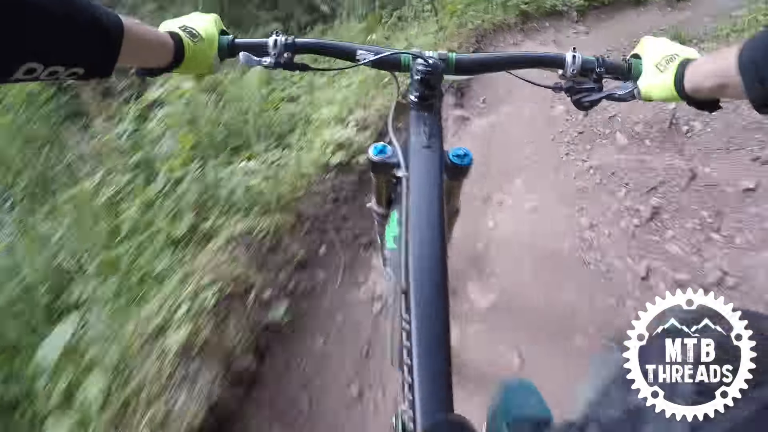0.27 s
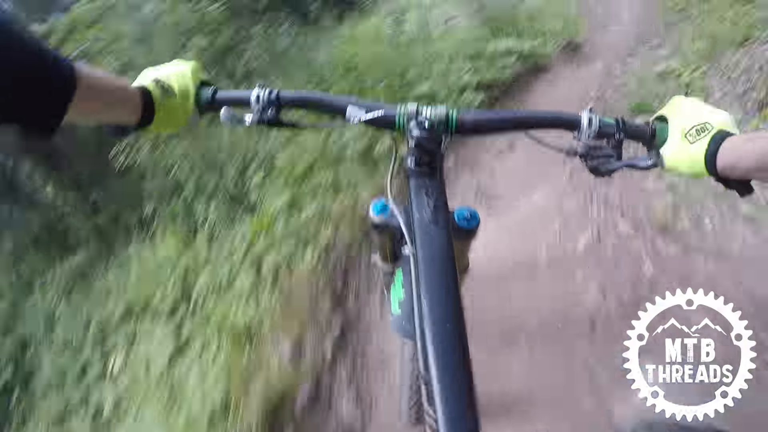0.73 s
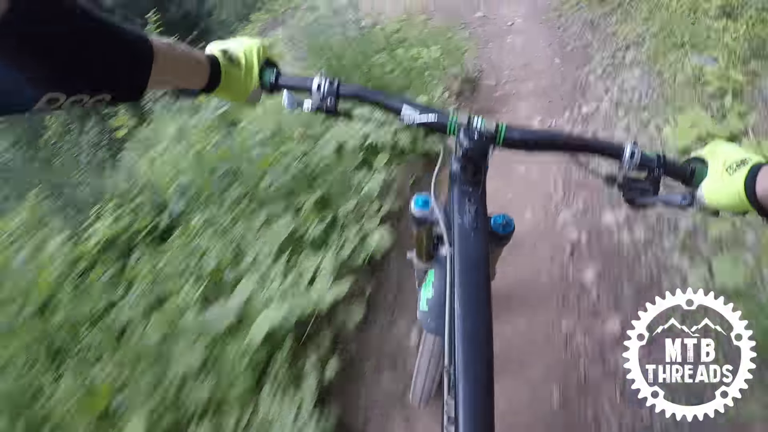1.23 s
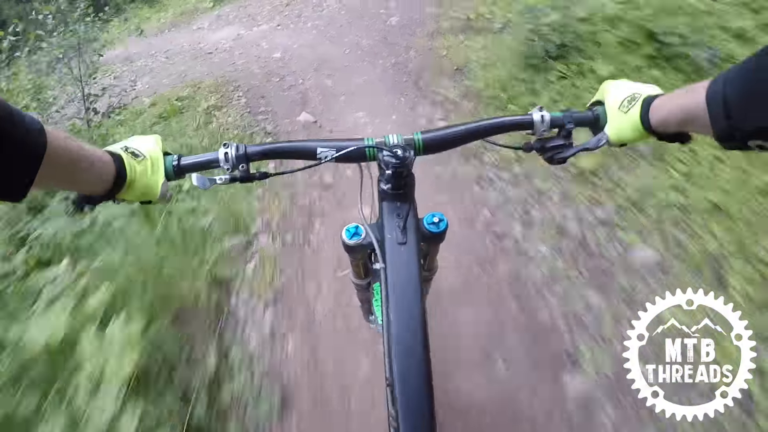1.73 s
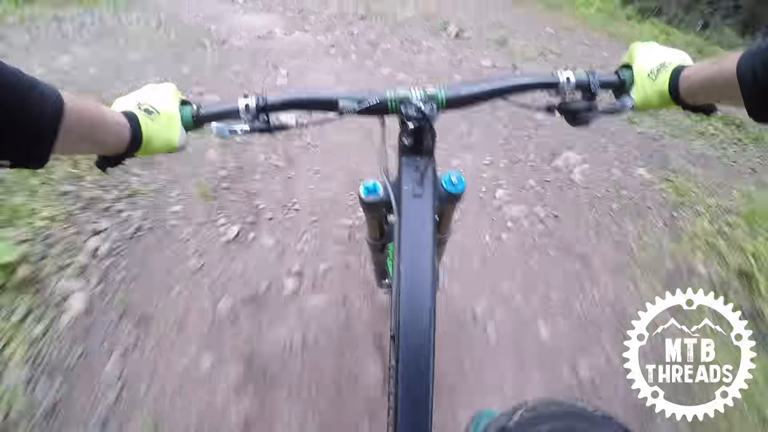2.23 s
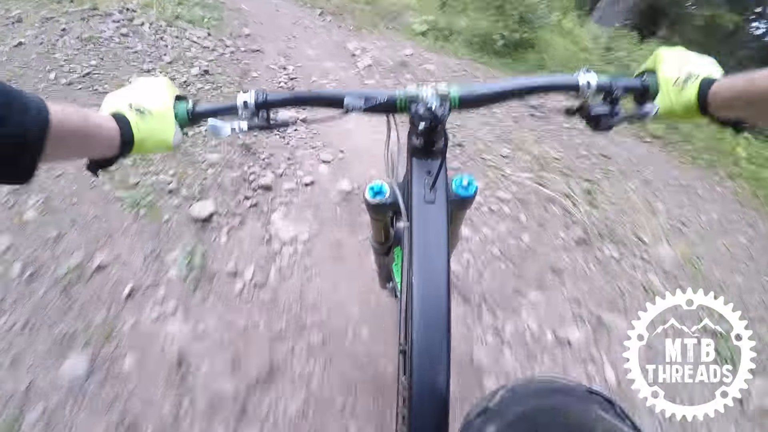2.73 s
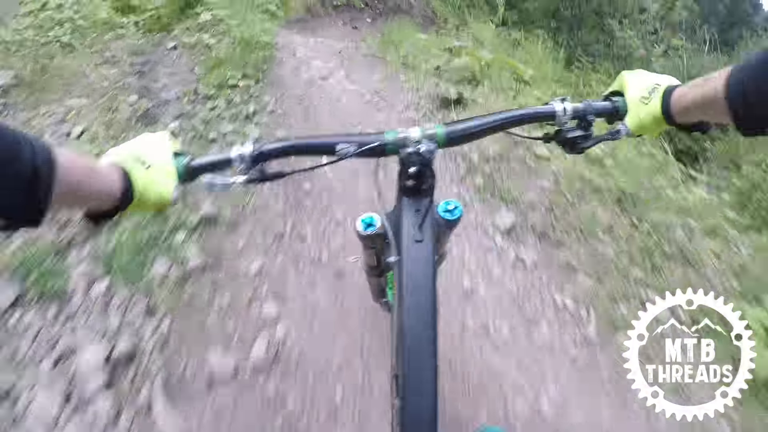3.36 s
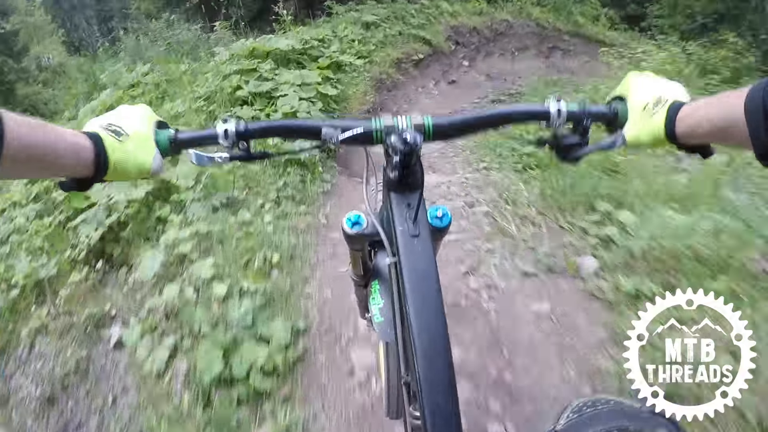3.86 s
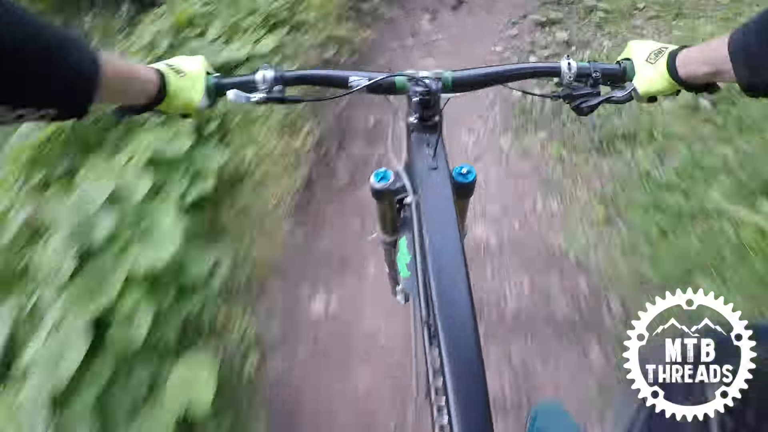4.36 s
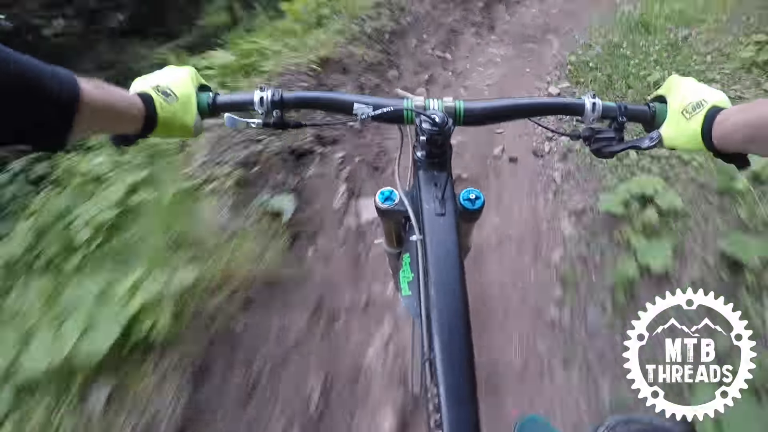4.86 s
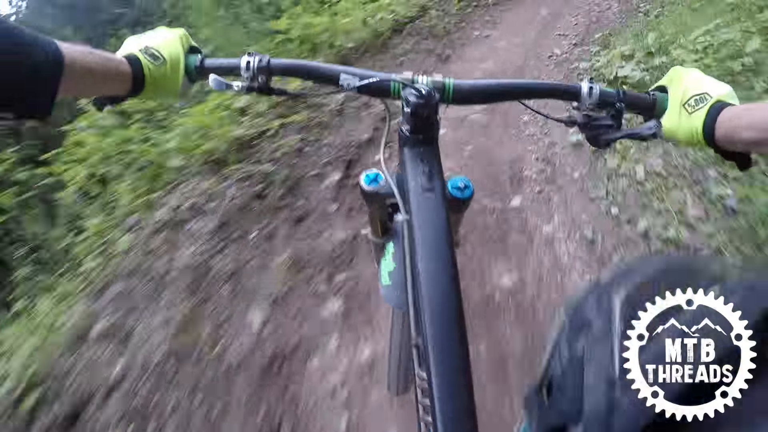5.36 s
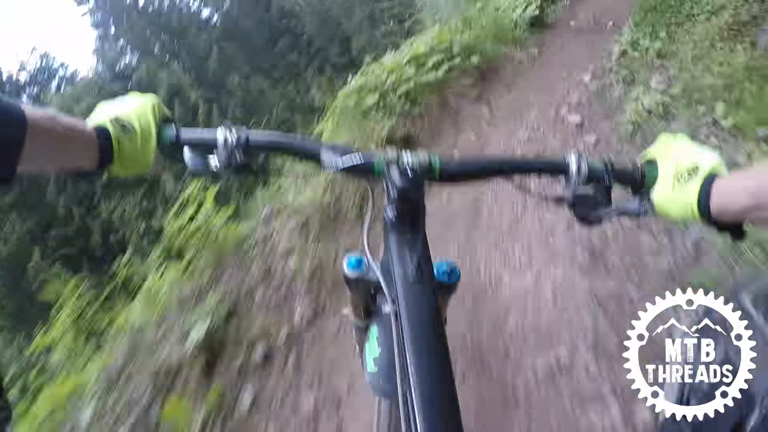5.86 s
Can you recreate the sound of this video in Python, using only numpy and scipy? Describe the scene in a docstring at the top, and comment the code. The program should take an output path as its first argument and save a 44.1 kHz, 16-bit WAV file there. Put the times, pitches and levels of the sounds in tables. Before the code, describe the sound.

Close, dry and windy outdoor bike sound: quick clacks of chain and cable on a hollow frame, with a hard knock half a second in. The rattling eases briefly around one second, then resumes with thumps and louder gravel crunch near two. It thins to wind and light grit past three, then bursts into dense knocks near four and a half. Low gusts bump the chest-mounted microphone throughout, with a very faint high hiss early on.

```python
"""Wind buffets a microphone on the rider's chest as a mountain bike runs down a stony dirt trail.
Shaped noise makes the wind and the bed of tyre crunch; damped clicks and noise snaps make grit and stones.
Chain and cables slap the frame as noise bursts with ringing modes; the fork thuds as damped sine swings.
A thin narrow-band hiss near the top of hearing comes and goes, and the top treble differs left to right."""
import sys
import numpy as np
from scipy import signal
from scipy.fft import rfft, irfft, next_fast_len
from scipy.io import wavfile
from scipy.ndimage import uniform_filter1d, minimum_filter1d, map_coordinates

SR = 44100
rng = np.random.default_rng(int(sys.argv[2]) if len(sys.argv) > 2 else 0)


def master_out(mix):
    """Clip the mix to full scale and print it as 16-bit PCM to the path in sys.argv[1]."""
    frames = np.transpose(np.atleast_2d(mix))
    ceiling = np.clip(frames, -1, 1)
    pcm = np.round(ceiling * 32767).astype(np.int16)
    wavfile.write(sys.argv[1], SR, pcm)


N = 268569  # length in samples

# Resonances of the bike frame. Each row: centre in Hz, bandwidth in Hz, relative level in dB.
FRAME_MODES = [(1467, 44, -17), (2356, 110, -4), (2807, 68, -2.5), (3806, 37, -17.5), (5400, 280, -5),
               (5810, 260, -6)]
# Colour of crushed grit. Each row: frequency in Hz, relative level in dB.
GRIT_COLOUR = [(350, -27), (600, 0), (1240, -7), (1450, -7), (2130, -11), (2340, -8.5), (3380, -15),
               (4100, -10), (4820, -14.5), (5760, -11.5), (6970, -27.5), (8320, -26), (11100, -35),
               (13200, -27.5), (15600, -41)]
# Colour of stones and slapping links. Each row: frequency in Hz, relative level in dB.
CLATTER_COLOUR = [(410, -3), (700, -3), (1150, -5.5), (1430, -2.5), (1880, -2), (2560, -2), (2770, -3),
                  (3150, -5.5), (3930, -3.5), (4840, -5), (5960, -5.5), (9260, -22.5), (10800, -37),
                  (12800, -18.5), (15600, -40)]


def amp(db):
    """Decibels to a linear amplitude."""
    return 10 ** (np.asarray(db) / 20)


def unit(x):
    """x scaled to an rms of 1."""
    return x / np.sqrt(np.mean(x ** 2) + 1e-20)


def along(points, hz):
    """Values at hz, read between (Hz, value) points on a log frequency axis."""
    f, v = np.transpose(points)
    return np.interp(np.log(hz + 1), np.log(f + 1), v)


def curves(rows):
    """One value per sample for each column after the time in seconds."""
    s, *columns = np.transpose(rows)
    return [np.interp(np.arange(N) / SR, s, column) for column in columns]


def wobble(rate):
    """A smooth random curve through normal random knots, rate knots a second."""
    knots = rng.standard_normal(int(N * rate / SR) + 4)
    return map_coordinates(knots, [np.arange(N) * rate / SR])


def filtered(x, response):
    """x shaped by a response, real or complex, that is a function of frequency in Hz."""
    m = next_fast_len(N + SR // 2)
    hz = np.fft.rfftfreq(m, 1 / SR)
    return irfft(rfft(x, m) * response(hz), m)[..., :N]


def above(hz, edge_hz, order):
    """Smooth high-pass share, 0 to 1."""
    return 1 - 1 / (1 + (hz / edge_hz) ** order)


def rush(spectrum, patchy_db):
    """Coloured noise of rms 1, uneven in time and frequency through patches of random gain."""
    z = signal.stft(rng.standard_normal(N), nperseg=512)[2]
    patches = uniform_filter1d(rng.standard_normal(z.shape), 5, 0)  # smooth over frequency
    patches = uniform_filter1d(patches, 8, 1)  # smooth over time
    x = signal.istft(z * amp(patchy_db * unit(patches)), nperseg=512)[1][:N]
    return unit(filtered(x, lambda hz: amp(along(spectrum, hz))))


def frame(hz, share):
    """Response of the bike frame: a flat path plus resonant band-pass modes, weighted by share."""
    modes = sum(amp(db) * 1j * hz * width / (centre * centre - hz * hz + 1j * hz * width)
                for centre, width, db in FRAME_MODES)
    return 1 + share * modes


def wind():
    """Steady buffeting and roar; each gust adds one slow push of the diaphragm and a swell of the roar."""
    # Steady wind between gusts. Each row: time in seconds, buffeting level in dB, roar level in dB.
    steady = [(0.0, -15.5, -32.5), (0.37, -14.5, -32.5), (0.52, -18, -31), (1.31, -26, -36),
              (2.03, -16, -23.5), (2.19, -16.5, -24.5), (2.53, -18.5, -36.5), (2.95, -20, -31),
              (3.29, -14, -33.5), (3.48, -21, -42.5), (3.66, -27, -27.5), (3.8, -24.5, -29.5),
              (4.09, -22.5, -29), (4.49, -21.5, -25.5), (4.95, -20.5, -34.5), (5.77, -19.5, -30),
              (5.92, -16.5, -26), (6.09, -21, -42)]
    # Colour of the low buffeting. Each row: frequency in Hz, relative level in dB.
    buffet_colour = [(7.1, -49), (12, 2.5), (38, -3.5), (134, -13), (200, -38), (260, -30), (440, -120)]
    # Colour of the roar. Each row: frequency in Hz, relative level in dB.
    roar_colour = [(76, -12.5), (130, -2), (295, -3.5), (389, -10.5), (492, -8.5), (675, -21),
                   (1500, -36.5), (1950, -48), (3300, -120)]
    # Eddies that hit the microphone.
    # Each row: centre in seconds, push level in dB, swing of the push in Hz, roar swell level in dB.
    gusts = [(0.112, -4, 43, -28), (0.273, -5.5, 63.6, -50), (0.345, -5.5, 30.5, -25), (0.537, -5, 39, -17),
             (0.678, -7, 32, -22), (0.86, -8, 30, -49), (1.118, -6.5, 45, -47), (1.438, -4, 36, -33),
             (1.562, -5, 36.2, -25), (1.764, -8, 30.5, -20.5), (1.846, -15, 76, -21.5),
             (1.919, -7, 30.7, -23), (2.062, -5, 45.3, -32), (2.175, -7.5, 40, -30), (2.258, -6, 49.6, -19),
             (2.349, -14, 36, -36), (2.447, -1, 53.5, -26), (2.629, -7, 64, -47), (2.781, -9, 28.8, -24),
             (2.883, -6, 56, -12.5), (2.945, -5.5, 30.8, -29), (3.075, -4, 48.7, -31),
             (3.193, -25, 36, -46), (3.265, -6.5, 34.5, -49), (3.425, -7.5, 67.7, -54),
             (3.93, -10.5, 40.8, -21), (4.323, -6, 29.4, -19), (4.474, -9, 38, -37), (4.527, -9, 24.5, -41),
             (4.676, -4, 59.5, -21.5), (4.879, -4.5, 59, -19.5), (5.039, -8, 37.6, -49),
             (5.206, -21, 38.6, -28), (5.261, -8, 29.4, -46), (5.466, -7.5, 27, -57),
             (5.534, -8, 34.4, -24.5), (5.648, -4.5, 83, -20), (5.771, -6.5, 66.5, -27),
             (5.838, -2, 36, -24), (5.931, -4.5, 38.6, -23)]
    push_turns, swell_s = .36, .014  # push width in cycles of its swing; swell width in seconds

    buffet_db, roar_db = curves(steady)
    buffet = unit(amp(1.3 * wobble(12)) * rush(buffet_colour, patchy_db=0))
    roar = unit(amp(2.17 * wobble(30)) * rush(roar_colour, patchy_db=2.5))
    pushes = np.zeros(N)
    roar_power = amp(roar_db) ** 2
    phases = rng.uniform(0, 2 * np.pi, len(gusts))
    for (s, push_db, hz, swell_db), phase in zip(gusts, phases):
        near = np.arange(-SR // 12, SR // 12) + round(s * SR)
        u = near / SR - s  # seconds from the centre of the gust
        swing = np.sin(2 * np.pi * hz * u + phase)
        pushes[near] += amp(push_db) * swing * np.exp(-.5 * (u * hz / push_turns) ** 2)
        roar_power[near] += amp(swell_db) ** 2 * np.exp(-(u / swell_s) ** 2)
    return amp(buffet_db) * buffet + pushes + np.sqrt(roar_power) * roar


def tyres():
    """A bed of crushed grit with single pieces clicking and stones snapping out in clumps."""
    # Loudness of the tyres on the trail. Each row: time in seconds, crunch level in dB.
    crunch = [(0.0, -42), (0.52, -36), (0.8, -42.5), (1.24, -43), (2.03, -30.5), (2.34, -30), (2.63, -36.5),
              (3.05, -38.5), (3.17, -46.5), (3.39, -44.5), (3.8, -37.5), (4.14, -38.5), (4.51, -29.5),
              (4.66, -33.5), (4.94, -38), (5.17, -33.5), (5.48, -32), (6.09, -35)]
    # The treble dips briefly after the hard knock, as gain control would do; set here on this layer.
    # One row: start in seconds, length in seconds, change in dB.
    treble_dip = (.538, .036, -12)
    grain_db, stones_db = -4, -6.5  # levels before the crunch level is applied

    level_db, = curves(crunch)
    bed = rush(GRIT_COLOUR, patchy_db=3.0) * amp(2.0 * wobble(25))

    chance = 500 / SR * amp(4.6 * wobble(24))  # around 500 snaps a second, in clumps
    snaps = (rng.random(N) < chance) * amp(16 * rng.exponential(1, N).clip(0, 3))
    t = np.arange(SR // 50) / SR
    crackle = signal.fftconvolve(snaps, amp(-60 * t / 0.024))[:N]  # each snap dies away in a few ms
    stones = filtered(np.abs(crackle) * rng.standard_normal(N),
                      lambda hz: amp(along(CLATTER_COLOUR, hz)) * frame(hz, share=0.39))

    start, length, dip_db = treble_dip
    inside = abs(np.arange(N) / SR - start - length / 2) < length / 2
    level_db += dip_db * uniform_filter1d(1. * inside, size=200)  # soft edges
    pieces = amp(grain_db) * unit(grains(count=7000))
    return amp(level_db) * unit(bed + pieces + amp(stones_db) * unit(stones))


def grains(count):
    """Tiny damped sine clicks of grit, each with its own pitch and size."""
    middle_hz, spread, turns = 3080, 0.568, 4.4  # pitch, its log scatter, decay time in cycles
    when, pitch, size = rng.random(count), rng.standard_normal(count), rng.exponential(1, count)
    hz = np.clip(middle_hz * np.exp(spread * pitch), 700, 9000)[:, None]
    k = np.arange(160)  # samples in one click
    clicks = np.sin(2 * np.pi * hz * k / SR) * np.exp(-hz * k / SR / turns)
    clicks = amp(4.9 * size.clip(0, 3))[:, None] * clicks
    at = (when[:, None] * N).astype(int) + k
    return filtered(np.bincount(at.ravel(), clicks.ravel())[:N], lambda f: amp(along(GRIT_COLOUR, f)))


def slaps():
    """Each slap is a noise burst of tiny link contacts in three bands, and rings the frame modes."""
    # Chain and cable slaps. Each row: time in seconds, nominal peak in dB, hollow band in dB and
    # bright band in dB relative to that peak, time to fall 60 dB in seconds.
    knocks = [(0.0216, -18.5, -11, -29, 0.055), (0.2175, -13.5, -16, -34, 0.046),
              (0.2463, -9, -11, -17, 0.033), (0.3067, -28.5, -20, -22, 0.09), (0.347, -19, -12, -21, 0.084),
              (0.377, -6, -19.5, -19.5, 0.045), (0.3924, -21, -2, -30, 0.038),
              (0.4394, -21, -0.5, -12.5, 0.036), (0.522, -19.5, -0.5, 1, 0.035),
              (0.5292, -21, 9, -33, 0.027), (0.574, -21.5, -19, -12, 0.046), (0.591, -21, -16, -20, 0.049),
              (0.6025, -18, -12, -14.5, 0.091), (0.6504, -11.5, -5.5, -12, 0.036),
              (0.6644, -18, -4.5, -14, 0.073), (0.738, -14, -9, -19, 0.051), (0.852, -16, -11, -16, 0.05),
              (1.2417, -31.5, -2, -4, 0.029), (1.3139, -3, -16.5, -21, 0.056),
              (1.33, -11.5, -33, -15, 0.05), (1.3702, -8, -16.5, -20.5, 0.073),
              (1.3918, -9.5, -15.5, -25.5, 0.069), (1.455, -26, -11, -14, 0.06),
              (1.6516, -29, -8, -29, 0.065), (1.692, -11.5, -12.5, -20.5, 0.04),
              (1.7138, -18.5, -10.5, -19, 0.073), (1.8364, -12.5, -21, -26, 0.036),
              (1.8608, -14.5, -12, -14.5, 0.043), (1.9604, -20, -8, -9.5, 0.044),
              (1.9924, -13, -20, -43, 0.065), (2.0323, -14.5, -14, -17, 0.046),
              (2.0854, -9, -14, -19, 0.028), (2.16, -16.5, -11, -21, 0.17), (2.376, -6, -15, -19, 0.065),
              (2.413, -14, -6, -22, 0.075), (2.4368, -18, -7, -19, 0.12), (2.4573, -11.5, -18, -18.5, 0.12),
              (2.5458, -10, -18, -19, 0.033), (2.6876, -16, -6, -15.5, 0.036),
              (2.813, -18.5, -2.5, -23, 0.026), (2.879, -22, -6, -28, 0.031),
              (2.8945, -17, -15, -20, 0.072), (2.9078, -6.5, -15, -24, 0.057),
              (2.9234, -8.5, -17, -24, 0.095), (2.9584, -20, -13, -21, 0.026),
              (2.9881, -24, -12, -16, 0.051), (3.0564, -14, -36, -14.5, 0.044),
              (3.0682, -16, -6.5, -36, 0.1), (3.0963, -15.5, -10.5, -17, 0.11),
              (3.131, -14, -8.5, -20, 0.061), (3.1643, -20, -14, -26, 0.052),
              (3.192, -20.5, -20, -16.5, 0.087), (3.2065, -34, -20, -24, 0.042),
              (3.3996, -27.5, -7, -33, 0.05), (3.4984, -27, -10, -44, 0.043),
              (3.8791, -16, -10.5, -22, 0.09), (3.9692, -11, -18, -22, 0.048),
              (4.0723, -5, -14.5, -21.5, 0.053), (4.122, -20, -5, -13.5, 0.14),
              (4.2423, -19, -30, -13, 0.047), (4.2923, -32, 7, -8, 0.04), (4.371, -8, -19, -22, 0.071),
              (4.3918, -5, -7.5, -19.5, 0.035), (4.4508, -3.5, -8, -14, 0.024),
              (4.46, -12.5, -13, -27, 0.074), (4.4788, -6, -11, -19, 0.07), (4.505, -14, -14, -27, 0.2),
              (4.5543, -15, -16, -19, 0.098), (4.583, -28, -16, -5, 0.037), (4.629, -24, -8, -13, 0.057),
              (4.8045, -28, 0, -31, 0.06), (4.818, -20, 1.5, -18, 0.043), (4.9472, -12.5, -29, -22, 0.051),
              (4.9905, -6, -9.5, -21.5, 0.03), (5.0164, -21, -28, -14, 0.043),
              (5.1484, -4.5, -13.5, -30, 0.046), (5.1936, -18, -12, -28, 0.036),
              (5.211, -7, -14, -17, 0.032), (5.2317, -19.5, -3.5, -16, 0.073), (5.277, -7, -14, -18, 0.076),
              (5.3433, -16.5, -6.5, -20, 0.065), (5.46, -16.5, -20, -11.5, 0.026),
              (5.485, -36.5, 10.5, -32, 0.068), (5.5215, -24, 0, -15, 0.16),
              (5.5767, -8.5, -12, -20.5, 0.062), (5.628, -16.5, -8, -21, 0.2),
              (5.673, -10, -15, -16.5, 0.075), (5.842, -10.5, -24, -21, 0.073),
              (5.8546, -14.5, -9, -33, 0.065), (5.877, -8.5, -12.5, -21, 0.095),
              (5.9309, -21.5, 5.5, -32, 0.033)]
    rise_s, fall_power, crest_db = 0.0023, 1.25, 11  # the fall steepens; peak over rms in dB
    lead_s, lead_db = .006, -18  # a faint noise swells in just before each slap
    ring_rise_s, ring_db, ring_scatter_db = .0012, -9, 4  # each slap excites the modes differently

    shape, rings = np.zeros((3, N + SR)), np.zeros(N + SR)
    t = np.arange(SR // 8) / SR
    lead = round(SR * .02)
    scatters = rng.standard_normal((len(knocks), len(FRAME_MODES)))
    for (s, db, hollow_db, bright_db, t60), scatter in zip(knocks, scatters):
        burst = amp(db - 60 * (t / max(t60, .005)) ** fall_power) * (1 - np.exp(-t / rise_s))
        swell_in = amp(db + lead_db) * np.exp(-t[lead:0:-1] / lead_s)
        burst = np.append(swell_in, burst)
        band_gains = amp([[hollow_db], [-crest_db], [bright_db]])
        shape[:, round(s * SR) - lead:][:, :len(burst)] += band_gains * burst
        ring = sum(amp(db + ring_db + level + ring_scatter_db * r)
                   * np.exp(-np.pi * width * t) * np.sin(2 * np.pi * centre * t)
                   for (centre, width, level), r in zip(FRAME_MODES, scatter))
        rings[round(s * SR):][:len(t)] += (1 - np.exp(-t / ring_rise_s)) * ring

    links = rng.standard_normal(N) * amp(3.5 * wobble(600) + 1.8 * wobble(150))  # uneven contacts

    def body(hz):
        """Clatter colour and frame response, split into hollow, middle and bright bands."""
        hollow = 1 - above(hz, 1910, order=6)
        middle = above(hz, 2700, order=6) - above(hz, 5600, order=6)
        bright = above(hz, 6770, order=6)
        return amp(along(CLATTER_COLOUR, hz)) * frame(hz, share=1.13) * [hollow, middle, bright]

    scale = np.std(filtered(links, body), axis=1, keepdims=True)  # evens out the three bands
    return (filtered(shape[:, :N] * links, body) / scale).sum(0) + rings[:N]


def thuds():
    """A short damped swing of fork and frame, falling in pitch, with a dull puff and a short crack."""
    # Thuds on roots and stones. Each row: time in seconds, nominal peak in dB, settled pitch in Hz,
    # time to fall 60 dB in seconds.
    blows = [(0.517, -6, 256, 0.067), (.531, -3, 667, 0.032), (.894, -15, 139, 0.11),
             (1.116, -15, 118, 0.19), (1.832, -7.5, 120, 0.053), (1.98, -6, 166, 0.053),
             (2.03, -16, 140, 0.076), (2.221, -5.5, 312, 0.028), (2.423, -14.5, 109, 0.073),
             (2.626, -15, 116, 0.21), (2.872, -3.5, 109, 0.072), (3.081, -11.5, 190, 0.044),
             (3.082, -15.5, 610, 0.11), (2.184, -13, 560, 0.029), (4.819, -16, 880, .03),
             (5.778, -16, 550, 0.048), (5.932, -16, 1490, .03), (4.393, -11, 1430, 0.025),
             (4.297, -5, 151, 0.022), (4.364, -5.5, 128, 0.076), (4.557, -10.5, 680, 0.062),
             (4.655, -4.5, 144, 0.094), (4.778, -16, 140, 0.047), (4.955, -10, 134, 0.058),
             (5.636, -2, 123, 0.1), (5.758, -13, 112, 0.15)]
    crack_db, crack_s = -24, 0.002  # hard first contact: level against the thud, time to fall 60 dB

    out, t = np.zeros(N + SR), np.arange(SR // 4) / SR
    for s, db, hz, t60 in blows:
        bend = 0.23 * 0.0073 * (1 - np.exp(-t / 0.0065))  # pitch starts about a quarter higher
        swing = np.sin(2 * np.pi * hz * (t + bend))
        puff = uniform_filter1d(rng.standard_normal(len(t)), size=24) * 0.54
        envelope = amp(db - 60 * t / max(t60, .005)) * (1 - np.exp(-t / 0.0017))
        crack = amp(db + crack_db - 60 * t / crack_s) * rng.standard_normal(len(t))
        out[round(s * SR):][:len(t)] += envelope * (swing + puff) + crack
    return out[:N]


def hiss():
    """Thin narrow noise around one high resonance, probably a brake pad on its disc."""
    # Each row: start in seconds, length in seconds, level in dB.
    spells = [(.15, 0.23, -57), (.6, 0.11, -58), (.9, .8, -59), (2.72, .18, -54)]
    fade_s = .04
    t = np.arange(N) / SR
    gain = sum(amp(db) * np.clip(np.minimum(t - s, s + length - t) / fade_s, 0, 1)
               for s, length, db in spells)
    noise = filtered(rng.standard_normal(N), lambda hz: 1 / (1 + ((hz - 13100) / 220) ** 2))
    return gain * unit(noise)


def scene():
    """All sources summed, the same in both channels."""
    sound = wind() + tyres() + slaps() + thuds() + hiss()
    return np.array([sound, sound])


def record(dry):
    """Two ports alike but for the level and wandering phase of the top treble; then limiter and top cut."""
    left_db, right_db = -3, 3.5  # gain of the top treble at each port
    lead_rad, wander_rad = 4.7, 0.78  # phase lead of the left treble and its wander
    top_hz = 15720  # nothing passes from here up

    top = filtered(dry[0], lambda hz: above(hz, 10760, order=40))
    quarter_turn = filtered(top, lambda hz: 1j + 0 * hz)  # top treble a quarter cycle ahead
    lead = lead_rad + wander_rad * wobble(42)
    left = np.cos(lead) * top + np.sin(lead) * quarter_turn
    x = dry - top + amp([[left_db], [right_db]]) * np.array([left, top])

    # limiter: hold the lowest gain needed nearby, then smooth it
    need = np.minimum(1, .99 / (np.abs(x).max(0) + 1e-9))
    x = x * uniform_filter1d(minimum_filter1d(need, size=600), size=300)
    return filtered(x, lambda hz: hz < top_hz)


dry = scene()
out = record(dry)
master_out(out)
```